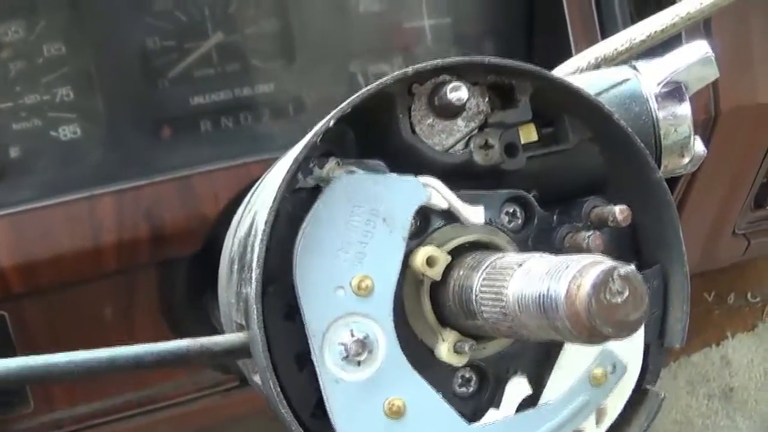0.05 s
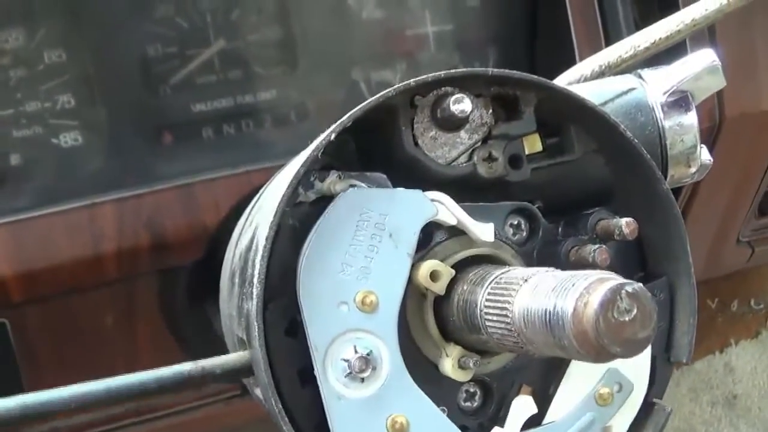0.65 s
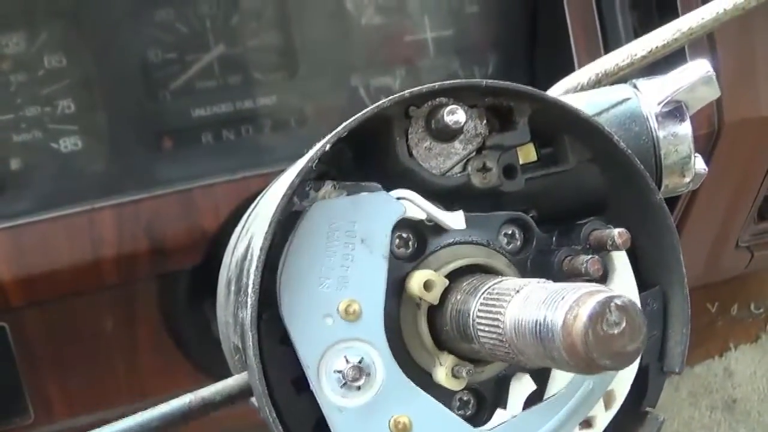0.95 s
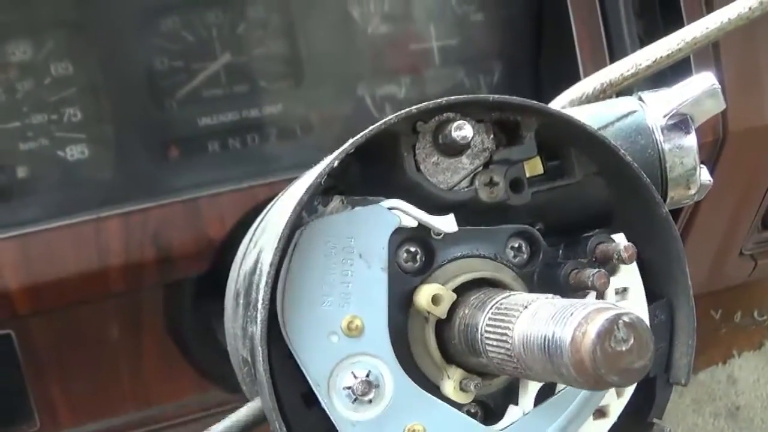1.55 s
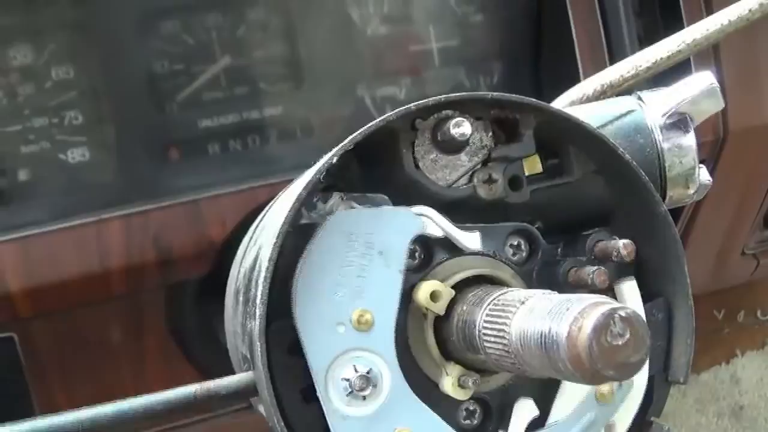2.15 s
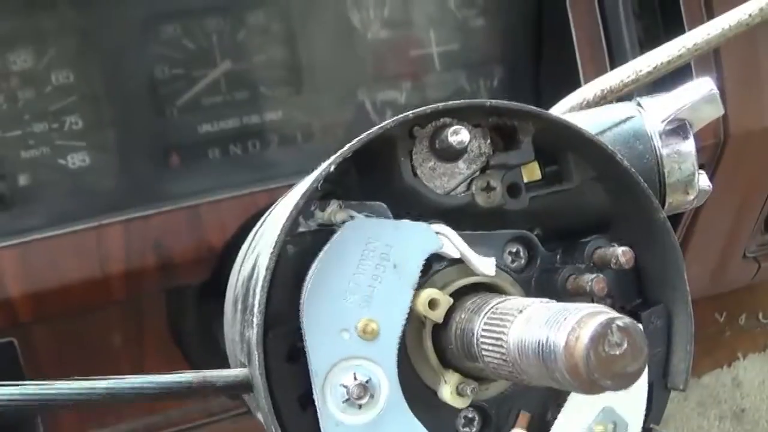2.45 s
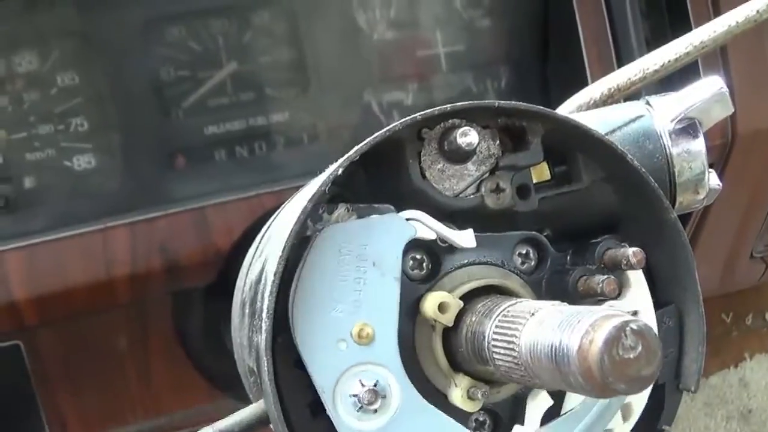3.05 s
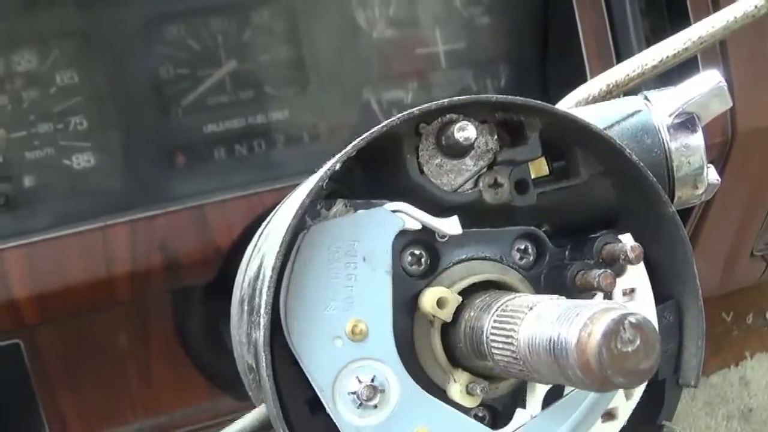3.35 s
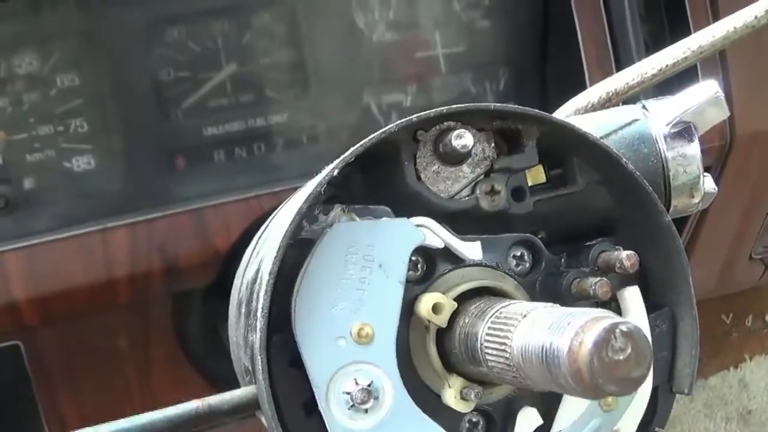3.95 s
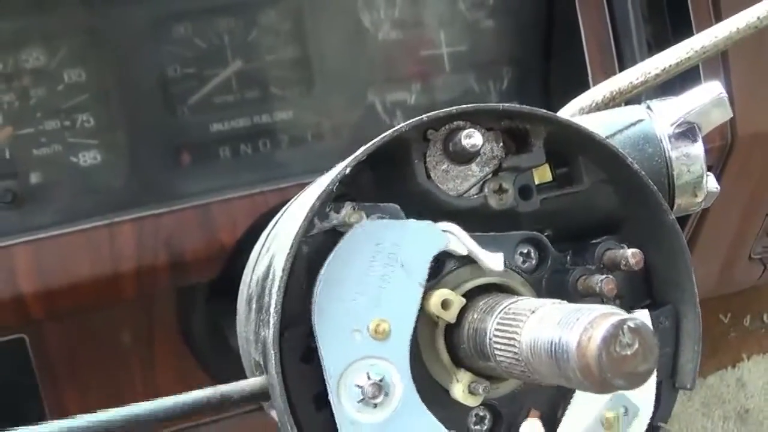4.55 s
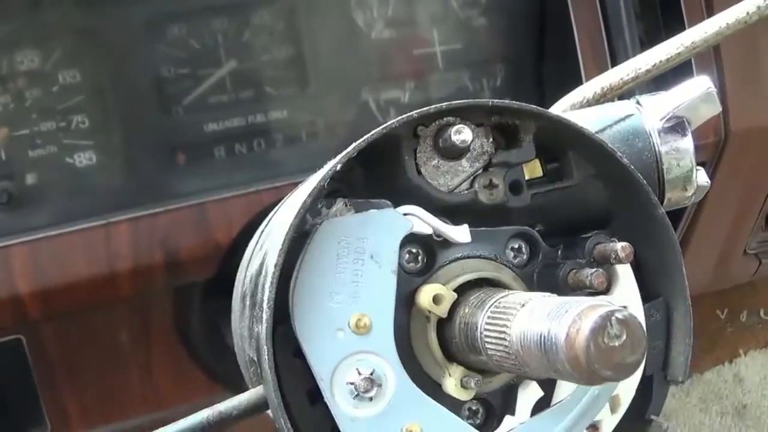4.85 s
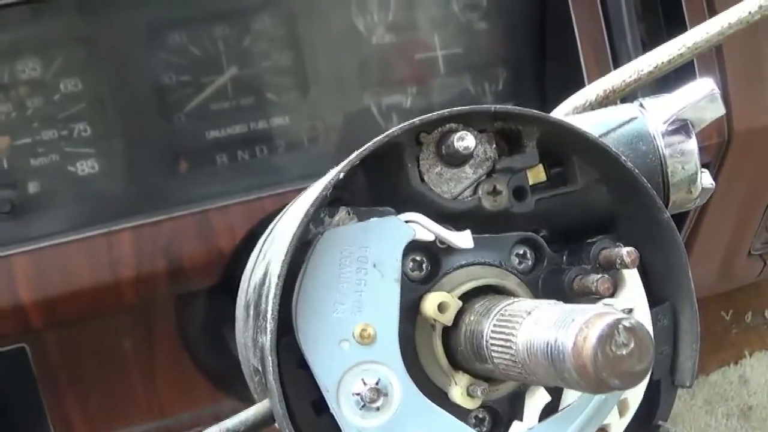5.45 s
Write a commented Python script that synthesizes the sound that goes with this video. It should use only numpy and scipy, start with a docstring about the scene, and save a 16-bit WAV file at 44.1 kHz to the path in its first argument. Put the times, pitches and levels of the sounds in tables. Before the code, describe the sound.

A turn signal lever on a parked car's exposed steering column is flicked up, back, down and back repeatedly. It makes ten sharp, close clicks at an uneven pace, each with a brief metallic ring and a soft thump. Faint ticks of loose parts and tiny squeaks fall in between. A low garage hum runs underneath and swells slightly toward the end.

```python
"""Over the low hum of a garage, a hand slides onto the turn-signal lever of a parked car's open column.
From 0.2 s it flicks the lever up, back, down and back, twice over. Each time a detent scrapes over its
cam and snaps home; springs and plate ring, the column thumps and the cabin answers. Loose parts tick
in between. From 3.7 s the hum swells and stays up. The lever goes up at 4.3 s and back at 4.7 s;
a few ticks and soft slides of the hand end the scene."""
import sys
import numpy as np
from scipy import signal
from scipy.fft import rfft, irfft
from scipy.io import wavfile
from scipy.ndimage import uniform_filter1d

SR = 44100
rng = np.random.default_rng(int(sys.argv[2]) if len(sys.argv) > 2 else 0)


def wav_record(signal):
    """Record a signal, one row per channel, as 16-bit PCM in the file named by sys.argv[1]."""
    frames = np.transpose(np.atleast_2d(signal))
    bounded = np.clip(frames, -1, 1)
    # unit amplitude maps onto the largest positive 16-bit level
    quanta = np.round(bounded * 32767).astype(np.int16)
    wavfile.write(sys.argv[1], SR, quanta)


N = 251370
TIME = np.arange(N) / SR
EVENT_TIME = TIME[:SR * 3 // 4]
UP, DOWN, CENTRE = 0, 1, 2  # lever notches


def undb(db):
    """Decibels to gain."""
    return 10 ** (np.asarray(db) / 20)


def unit_energy(x):
    """Scale to unit energy."""
    return x / np.sqrt(np.sum(x ** 2))


def pan_right(db):
    """Stereo gains: left down, right up by db."""
    return undb([[-db], [db]])


def decay(t60, t=EVENT_TIME):
    """Exponential decay, 60 dB in t60 seconds."""
    return np.exp(-np.log(1000) * t / t60)


def ring(hz, t60):
    """One struck mode."""
    return np.sin(2 * np.pi * hz * EVENT_TIME) * decay(t60)


def swell(centre_s, half_s):
    """Gaussian envelope."""
    return np.exp(-((TIME - centre_s) / half_s) ** 2)


def add(out, start_s, x):
    """Mix x into out from start_s on."""
    i = max(int(start_s * SR), 0)
    out[:, i:i + x.shape[-1]] += x[..., :N - i]


def colour(x, points, db_per_oct=0):
    """Filter by (f/Hz, level/dB) points and a tilt about 5 kHz, flat below 1 kHz."""
    hz, db = np.transpose(points)
    f = np.maximum(np.fft.rfftfreq(x.shape[-1], 1 / SR), 1)
    curve_db = np.interp(np.log(f), np.log(hz), db)
    tilt_db = db_per_oct * np.log2(np.maximum(f, 1000) / 5000)
    return irfft(rfft(x) * undb(curve_db + tilt_db), x.shape[-1])


def stereo_noise(n, width):
    """White noise; width is the side/mid ratio."""
    mid, side = rng.standard_normal((2, n))
    return np.array([mid + width * side, mid - width * side])


def drift(rate_hz):
    """Smooth random curve, spread near 1."""
    step = int(SR / rate_hz)
    held = np.repeat(rng.standard_normal(N // step + 1), step)
    return uniform_filter1d(held, step)[:N]


def diffuse(table, length_s):
    """Dense response: each third octave of noise builds up and dies at its own rate."""
    hz, *columns = np.transpose(table)
    t = EVENT_TIME[:int(length_s * SR)]
    f = np.fft.rfftfreq(len(t), 1 / SR)
    mid, side = rfft(rng.standard_normal((2, len(t))))
    edges = np.geomspace(hz[0] / 2 ** (1 / 6), hz[-1], int(3 * np.log2(hz[-1] / hz[0])) + 2)
    out = 0
    for lo, hi in zip(edges, edges[1:]):
        db, rise_s, t60, width = (np.interp(np.log(lo * hi) / 2, np.log(hz), c) for c in columns)
        spectrum = np.array([mid + width * side, mid - width * side])
        band = irfft(spectrum * ((f >= lo) & (f < hi)), len(t))
        build_up = 1 - np.exp(-(t / rise_s) ** 2)
        out = out + undb(db) * band * build_up * decay(t60, t)
    return out


# Garage noise spectrum: f/Hz, relative level/dB
AIR_SPECTRUM = [(12, -31), (20, -19.5), (38, 0), (59, -7.5), (98, -3), (119, -11), (137, -18), (225, -13.5),
                (266, -15.5), (549, -22.5), (788, -16.5), (2270, -32.5), (2760, -33.5), (14300, -40.5),
                (15500, -42)]


def garage_air(start_db=-49, rise_db_per_s=0.33):
    """Rumble and fan-like air noise, slowly rising."""
    mid, side = colour(rng.standard_normal((2, N)), AIR_SPECTRUM)
    side = colour(side, [(30, -50), (70, -61), (150, -22), (600, -8), (2500, -2), (6000, -6.5),
                         (12000, -23.5)])
    level_db = start_db + rise_db_per_s * TIME + 0.47 * drift(3.42)
    return np.array([mid + side, mid - side]) / np.std(mid) * undb(level_db)


# Hum and whine tones: f/Hz, base rms level/dB, waver/dB
HUM_TONES = [(87.5, -62, 3.5), (106.7, -59, 4), (695, -69, 4), (785, -76, 3), (892, -71, 5),
             (15735, -68.5, 2)]


def garage_hum(rise_at_s=3.7, rise_s=0.73, rise_db=8):
    """Wavering hum and thin electronic whine; the low tones swell once and stay up."""
    boost_db = rise_db * np.clip((TIME - rise_at_s) / rise_s, 0, 1)
    out = 0
    for hz, db, waver_db in HUM_TONES:
        detune_hz = 0.78 * waver_db * drift(14)
        phase = 2 * np.pi * (hz * TIME + np.cumsum(detune_hz) / SR)
        level_db = db + waver_db * drift(7) + boost_db * (hz < 200)
        out = out + np.sqrt(2) * np.sin(phase) * undb(level_db)
    return out


def electronic_chirp(hz=2830, pulse_hz=29.97, db=-67.5):
    """Faint pulsing tone with unsteady phase."""
    gate = (0.5 + 0.5 * np.cos(2 * np.pi * pulse_hz * TIME)) ** 2
    phase = 2 * np.pi * hz * TIME + 1.6 * drift(70)
    return undb(db) * np.sqrt(2) * gate * np.sin(phase)


# Sliding plastic spectrum: f/Hz, relative level/dB
SLIDE_SPECTRUM = [(800, -17), (2000, 6.5), (5000, -1.5), (9000, -0.5), (15000, -16)]
# Column bump spectrum: f/Hz, relative level/dB
BUMP_SPECTRUM = [(40, -12), (120, 1), (220, 4.5), (330, -9.5), (700, -14), (3000, -60)]
# Longer hand slides: centre t/s, half length/s, level/dB
HAND_SLIDES = [(0.023, 0.098, -56.5), (4.264, .035, -57.5), (5.182, 0.061, -65), (5.51, .1, -62.5)]


def hand(press_lead_s=0.06, nudge_delays_s=(0.212, 0.383)):
    """Plastic slides unevenly as the hand loads each throw and nudges the column after a down throw."""
    slide = colour(stereo_noise(N, 0.2), SLIDE_SPECTRUM) * undb(4 * drift(300))
    bump = colour(stereo_noise(N, 0.029), BUMP_SPECTRUM)
    presses = sum(swell(s - press_lead_s, half_s=0.041) for s, *_ in LEVER_THROWS)
    downs_s = [s for s, notch, *_ in LEVER_THROWS if notch == DOWN]
    nudges = sum(swell(s + delay_s, half_s=0.032) for s in downs_s for delay_s in nudge_delays_s)
    long_slides = sum(undb(db) * swell(s, half_s) for s, half_s, db in HAND_SLIDES)
    slide_gain = long_slides + undb(-69) * presses + undb(-67) * nudges
    bump_gain = undb(-58.5) * presses + undb(-50) * nudges
    return slide_gain * slide / np.std(slide) + bump_gain * bump / np.std(bump)


# Pivot modes: f/Hz, t60/s, relative level/dB
PIVOT_MODES = [(2950, 0.024, 5.5), (3150, 0.046, -15), (4740, .05, -2.5), (6420, 0.054, -0.5)]
# Squeaks: t/s, level/dB, pitch ratio
PIVOT_SQUEAKS = [(0.031, -53.5, 0.96), (.066, -50, 0.95), (2.432, -51, 0.94), (2.459, -47, 1),
                 (2.586, -49.5, 1.03)]


def pivot_squeaks(spread_db=2.3):
    """The lever pivot rings briefly, its mode balance different each time."""
    out = np.zeros((2, N))
    for s, db, pitch in PIVOT_SQUEAKS:
        for hz, t60, mode_db in PIVOT_MODES:
            add(out, s, undb(db + mode_db + spread_db * rng.standard_normal()) * ring(hz * pitch, t60))
    return out


# Tick spectrum: f/Hz, relative level/dB
TICK_SPECTRUM = [(800, -43), (1400, 0), (1900, 9.5), (2400, -0.5), (3300, 0.5), (5500, -0.5), (8000, 0),
                 (11000, -4.5), (15000, -25)]
# Clearer ticks: t/s, energy level/dB, tilt/(dB/oct)
LINKAGE_TICKS = [ (1.0186, -9, 2.5), (1.2152, -21, -1), (1.836, -19, -1), (1.8760, -20, 4),
                 (1.8822, -18.5, -4), (2.2770, -22, -2.5), (2.778, -23, -10), (2.8180, -20.5, 0.5),
                 (2.979, -10.5, 8), (2.996, -12, -2), (3.5936, -20, -2.5), (3.9974, -8, 11.5),
                 (4.242, -18.5, -9), (4.2985, -17, -2), (4.5636, -24, 0), (4.7717, -13.5, -1),
                 (5.0040, -21.5, 0), (5.2598, -15.5, 7.5)]


def loose_parts(faint_count=3, faint_db=-29, contact_at_0db_s=0.00029, db_per_doubling=6.5):
    """Play in the linkage ticks, with a faint cabin tail; softer contacts last longer."""
    out = np.zeros((2, N))
    faint_ticks = [(s, faint_db, 0) for s in rng.uniform(0, N / SR, size=faint_count)]
    for s, db, db_per_oct in LINKAGE_TICKS + faint_ticks:
        contact_s = contact_at_0db_s * 2 ** (-db / db_per_doubling)
        envelope = np.exp(-EVENT_TIME / contact_s) + undb(-27) * decay(t60=0.08)
        envelope = np.roll(envelope, SR // 500)  # 2 ms for the filter's pre-ring
        tick = colour(stereo_noise(len(EVENT_TIME), 0.17) * envelope, TICK_SPECTRUM, db_per_oct)
        add(out, s - 0.001, undb(db) * unit_energy(tick))
    return out


# Cabin response: f/Hz, level/dB, rise/s, t60/s, side/mid ratio
CABIN_BANDS = [(616, -12, 0.014, 0.18, .45), (1110, -11.5, 0.0044, .13, 0.42), (1720, -3, 0.006, 0.14, 0.4),
               (2350, -2.5, 0.017, 0.073, .5), (2950, 0.5, 0.011, 0.092, .5),
               (5650, -8, 0.0068, 0.11, 0.45), (8000, 0.5, 0.014, 0.086, 0.13),
               (11700, 1, 0.015, 0.077, 0.05), (13000, -13, .008, 0.083, 0.12),
               (16100, -15, .008, .085, 0.13)]


def cabin_reflections():
    """The cabin answers a snap with dense, short reflections."""
    return diffuse(CABIN_BANDS, length_s=0.2)


# Column bending modes: f/Hz, t60/s, level/dB
COLUMN_MODES = [(45.2, 0.99, -43.5), (106, 0.34, -40), (183.3, 0.26, -46.5), (235.1, 0.37, -41),
                (354.7, 0.19, -42.5), (493, 0.13, -47)]
# Dashboard shudder: f/Hz, relative level/dB, rise/s, t60/s, side/mid ratio
DASHBOARD_BANDS = [(25.5, 1, 0.041, 1, .01), (46, 0.5, 0.065, 0.59, .01), (71, -1.5, 0.059, 0.83, .02),
                   (109, 1.5, 0.042, 0.52, 0.029), (202, -1, 0.015, 0.43, 0.072),
                   (286, -9.5, 0.023, 0.48, 0.15), (477, -4.5, 0.0092, 0.21, 0.13),
                   (743, -8, 0.013, 0.23, 0.29), (1230, -23.5, 0.0048, 0.089, .35)]


def column_thump(rise_s=0.012, spread_db=0.5):
    """The heavy column takes a moment to start bending; the dashboard shudders with it."""
    modes = np.array([undb(db) * ring(hz, t60) for hz, t60, db in COLUMN_MODES])
    gains = undb(spread_db * rng.standard_normal(len(modes)))
    bending = (gains @ modes) * (1 - np.exp(-EVENT_TIME / rise_s))
    return bending + undb(-17) * diffuse(DASHBOARD_BANDS, length_s=0.75)


def spring_twang(notch):
    """Up notch: the detent spring rings as a beating pair. Otherwise the return spring rings."""
    if notch == UP:
        return undb(-27) * (ring(hz=11980, t60=0.09) + ring(hz=12108, t60=0.09))
    return undb(-32) * ring(hz=7887, t60=0.36)


# Plate and lever modes: f/Hz, t60/s, level/dB per notch (up, down, centre)
STEEL_MODES = [ (1513, .35, -56, -55, -56), (1656, 0.12, -51, -36.5, -39), (1743, 0.081, -44, -49, -42),
               (1841, .25, -58, -42, -39.5), (1990, 0.43, -54, -64, -74), (2125, 0.075, -46, -36, -51),
               (2240, 0.32, -61, -55, -59), (2560, 0.049, -29, -44, -44), (3020, 0.072, -69, -46, -36.5),
               (3273, .33, -60, -54, -52), (3500, 0.055, -34, -43, -42), (3840, 0.058, -33.5, -37, -59),
               (6045, .26, -68, -66, -55), (6584, .30, -68, -54, -61), (7402, .55, -72, -57, -57),
               (9960, .06, -39, -47, -39)]


def steel_ring(notch):
    """Struck plate and lever; each notch excites its own mix of modes."""
    return sum(undb(notch_db[notch]) * ring(hz, t60) for hz, t60, *notch_db in STEEL_MODES)


# Cam and housing modes: f/Hz, bandwidth/Hz, relative level/dB per notch (up, down, centre)
CAM_MODES = [ (1410, 490, -25, -20, -33), (1777, 215, -13.5, -12.5, -6.5), (3004, 700, -8, -5, -10.5),
             (3944, 1040, -13.5, -3, -8), (4374, 990, -5.5, 0.5, -3), (6090, 1900, -9, -6, -9),
             (7830, 1080, -6.5, 3.5, -1.5), (9020, 1200, 0, -1, -4.5), (10480, 1400, -3.5, -5, -4),
             (11770, 1400, -4.5, -7.5, -1), (13800, 1400, -18, -12, -29), (15400, 1500, -17, -22, -22)]


def cam_response(t, notch, db_per_oct, contact_s=0.00035):
    """Damped impulse response of cam and housing; the plastic yields briefly as the detent lands."""
    out = 0
    for k, (hz, width_hz, *notch_db) in enumerate(CAM_MODES):
        pan = pan_right(1.3 / (1 + (hz / 3800) ** 4))  # low modes radiate to the right
        gain = (-1) ** k * width_hz * undb(notch_db[notch] + db_per_oct * np.log2(hz))
        out = out + pan * gain * np.sin(2 * np.pi * hz * t) * np.exp(-np.pi * width_hz * t)
    return unit_energy(out * (1 - np.exp(-t / contact_s)))


# Scrape force spectrum: f/Hz, relative level/dB
SCRAPE_SPECTRUM = [(800, 10.5), (1700, 10), (3500, -4), (8000, -3), (12000, -19)]
# Chatter force spectrum: f/Hz, relative level/dB
CHATTER_SPECTRUM = [(800, -16), (1700, 3), (3500, 2.5), (6000, 0.5), (15000, -2)]


def detent_snap(notch, scrape_s, scrape_db, chatter_db, db_per_oct):
    """The detent scrapes over the cam's crest, strikes the notch and chatters to rest."""
    t = EVENT_TIME[:SR // 20]
    since_strike = t - scrape_s
    grit = stereo_noise(len(t), 0.18)
    scrape = colour(grit, SCRAPE_SPECTRUM) * (since_strike < 0) * undb(scrape_db - 24.5) * t / scrape_s
    rattle = undb(-23.5) * np.exp(-abs(since_strike) / 0.00074)
    settling = undb(chatter_db - 23) * np.exp(-abs(since_strike) / 0.0032)
    chatter = colour(grit, CHATTER_SPECTRUM) * (since_strike > 0.0003) * (rattle + settling)
    force = scrape + chatter
    force[:, int(scrape_s * SR)] += 1  # the strike
    return signal.fftconvolve(force, cam_response(t, notch, db_per_oct), axes=1)[:, :len(t)]


# Coupling by notch: scrape length/s, cabin gain/dB, steel gain/dB
NOTCH_COUPLING = {UP: (.0026, -1.6, 0), DOWN: (.0027, -0.91, 1.5), CENTRE: (.0029, 0.6, 0.71)}
# Throws: t/s, notch reached, then relative level/dB of strength, scrape, chatter, thump, spring
LEVER_THROWS = [ (0.2310, UP, -1, 7.5, 0.5, -1.5, -24), (0.8725, CENTRE, -0.5, 6, -7.5, 3.5, -21),
                (1.634, DOWN, -1.5, 5, -2, -0.5, -28), (2.1758, CENTRE, 0, 1, 6, 5.5, -4.5),
                (2.5324, UP, -1.6, 4.5, 5, -0.5, 1.5), (2.931, CENTRE, 0.1, 3, -1.5, 5, -24),
                (3.3877, DOWN, -1, 3, -0.5, -2, -30), (3.922, CENTRE, -0.5, -12, 4, 3, -15),
                (4.3173, UP, 1, -1.5, 2, -0.5, -3), (4.7065, CENTRE, 0.5, -2.5, -8.5, 3, -14)]


def lever(chatter_loss_db_per_db=0.2, chatter_dulling_per_oct=0.18):
    """Each throw snaps and shakes steel, spring, column and cabin; chatter softens and dulls the blow."""
    out = np.zeros((2, N))
    pan = pan_right(0.51)
    for s, notch, db, scrape_db, chatter_db, thump_db, spring_db in LEVER_THROWS:
        scrape_s, cabin_db, steel_db = NOTCH_COUPLING[notch]
        blow_db = db - chatter_loss_db_per_db * chatter_db
        db_per_oct = -0.34 - chatter_dulling_per_oct * chatter_db
        snap = detent_snap(notch, scrape_s, scrape_db, chatter_db, db_per_oct)
        add(out, s - scrape_s, undb(blow_db + 8) * snap)
        add(out, s, undb(blow_db + steel_db) * pan * steel_ring(notch))
        add(out, s, undb(spring_db) * spring_twang(notch))
        add(out, s, undb(thump_db) * column_thump())
        add(out, s, undb(db + cabin_db - 16.5) * pan * cabin_reflections())
    return out


def scene():
    """Lever, linkage and hand over the garage background."""
    foreground = lever() + loose_parts() + pivot_squeaks() + hand()
    return foreground + garage_air() + garage_hum() + electronic_chirp()


def record(dry):
    """Soft-clip the peaks, then low-pass."""
    ceiling, cutoff_hz = 0.72, 15900
    rounded = ceiling * np.tanh(dry / ceiling)
    return signal.sosfilt(signal.ellip(8, 0.2, 70, cutoff_hz, fs=SR, output="sos"), rounded)


dry = scene()
out = record(dry)
wav_record(out)
```